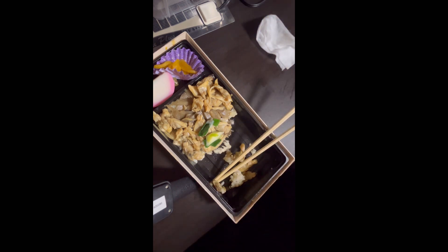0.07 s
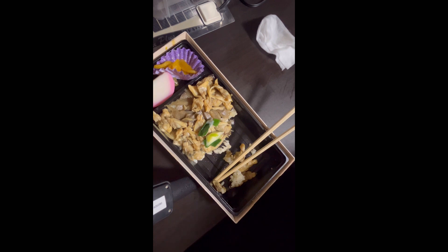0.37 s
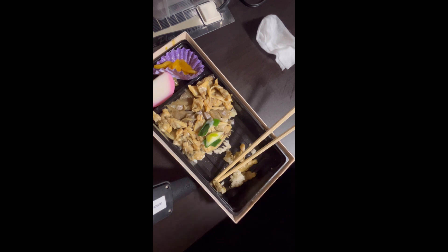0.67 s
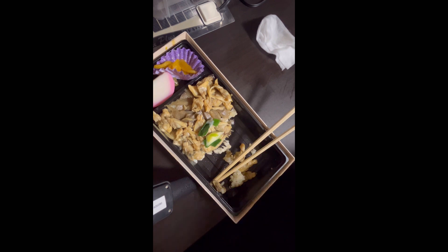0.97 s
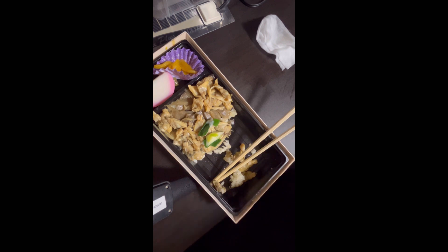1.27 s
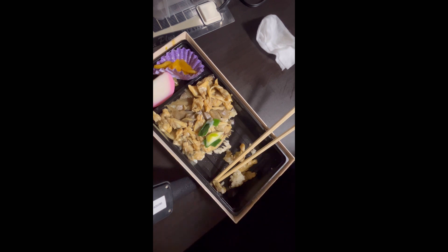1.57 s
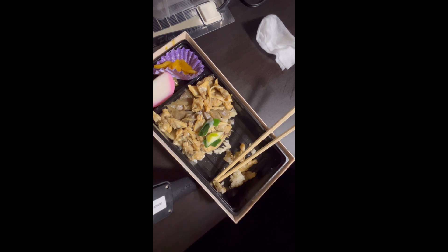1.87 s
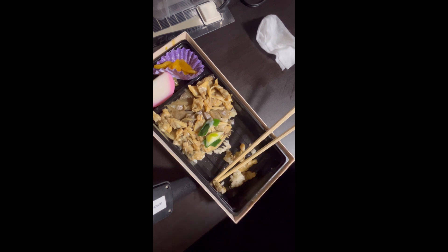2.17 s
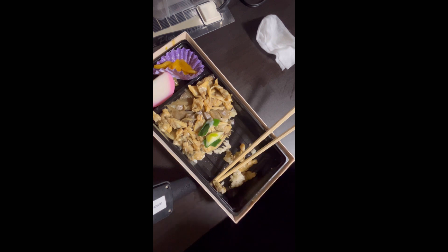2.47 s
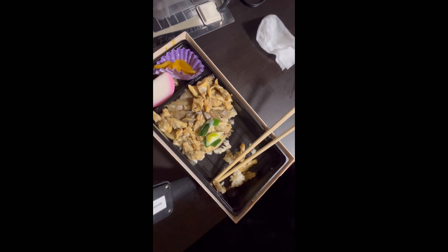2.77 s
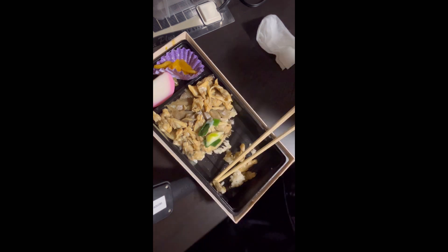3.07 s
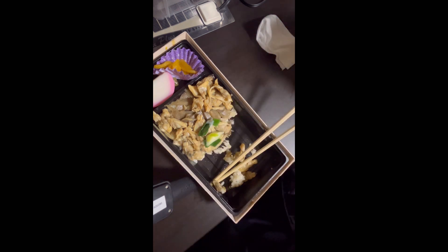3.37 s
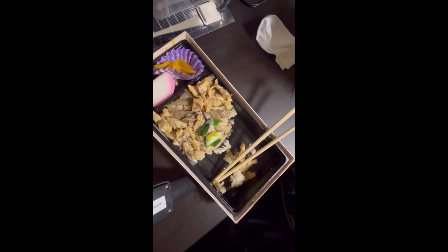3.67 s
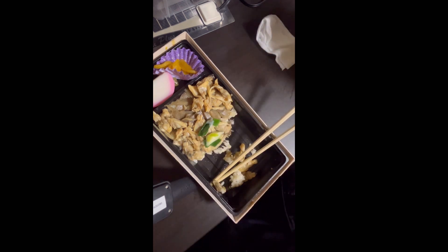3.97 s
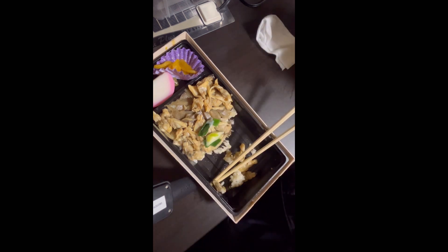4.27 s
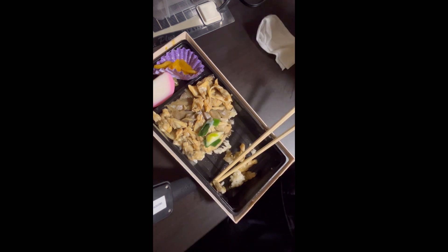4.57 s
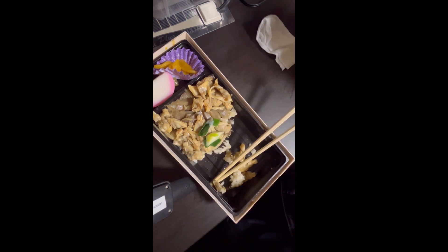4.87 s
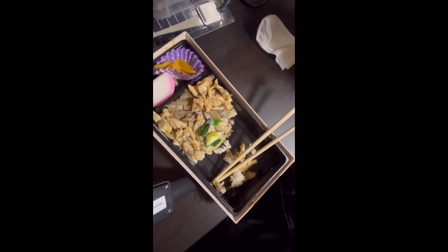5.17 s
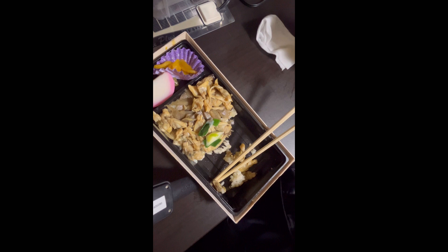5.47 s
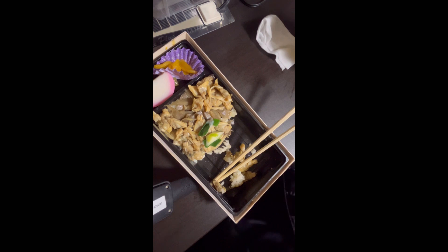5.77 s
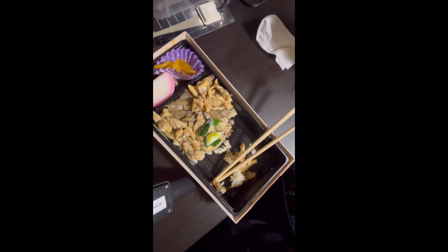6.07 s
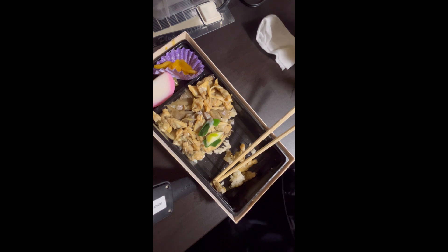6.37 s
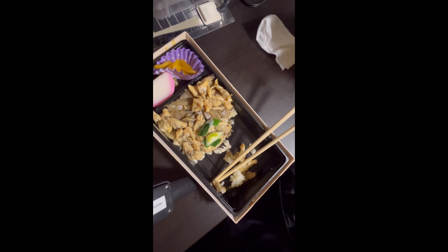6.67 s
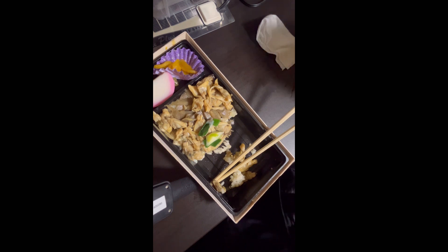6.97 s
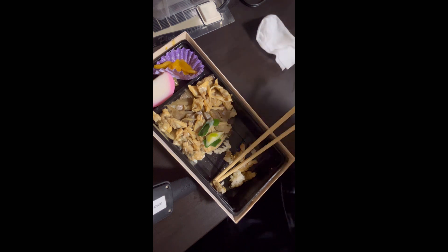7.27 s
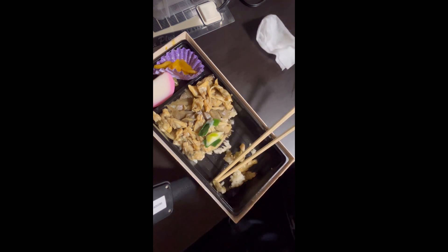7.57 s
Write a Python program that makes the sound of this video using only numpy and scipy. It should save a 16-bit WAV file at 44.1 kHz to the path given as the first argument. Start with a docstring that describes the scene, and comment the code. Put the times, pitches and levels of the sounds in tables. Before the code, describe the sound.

Wooden chopsticks pick about in a plastic food box on a table, heard from very near. Irregular soft taps and short scrapes come first, followed by a cluster of crisp wooden clicks. Midway the table judders dully and the box knocks hollowly against it, the loudest moment. After that only light scratching and sparse ticks remain, over faint cloth rustling and the low hum of indoor ventilation.

```python
"""Wooden chopsticks pick about in a plastic food box on a table, close by in a quiet room.
The tips tap, press and scrape the floor of the box; the sticks click on each other or the rim.
Blows ring damped modes, most with a noise crack; scrapes are stick-slip noise in wandering resonances.
The table judders in a dull bump, then the box rocks and knocks on it. A thin, high squeak sounds once.
A rustling sleeve and a low ventilation hum fill the gaps."""
import sys
import numpy as np
from scipy import signal
from scipy.fft import rfft, irfft
from scipy.io import wavfile

SR = 44100
rng = np.random.default_rng(int(sys.argv[2]) if len(sys.argv) > 2 else 0)


def waveform_to_disk(signal):
    """Save audio, clipped to [-1, 1], as 16-bit WAV at the path in sys.argv[1]."""
    frames = np.transpose(np.atleast_2d(signal))
    scaled = np.clip(frames, -1, 1) * 32767
    samples = np.round(scaled).astype(np.int16)
    wavfile.write(sys.argv[1], SR, samples)


N = 340893
BLOW_N = int(0.6 * SR)
BLOW_T = np.arange(BLOW_N) / SR


def amp(db):
    return 10 ** (np.asarray(db) / 20)


def unit_rms(x):
    return x / np.sqrt(np.mean(x ** 2) + 1e-20)


def unit_blow(x):
    """Scale to the energy of 10 ms at level one."""
    return x / np.sqrt(np.sum(x ** 2) / len(x) / (SR / 100))


def lookup(table, hz, column=1):
    """Interpolate over log frequency."""
    table = np.array(table)
    return np.interp(np.log(hz + 1), np.log(table[:, 0] + 1), table[:, column])


def decay(t, t60_s):
    return np.exp(-np.log(1000) * t / t60_s)


def add(mix, start_s, sound):
    part = mix[:, round(start_s * SR):][:, :sound.shape[1]]
    part += sound[:, :part.shape[1]]


def colour(x, gains, column=1):
    """Minimum-phase filter from (frequency [Hz], gain [dB]) rows."""
    log_gain = np.log(amp(lookup(gains, abs(np.fft.fftfreq(2048, 1 / SR)), column)))
    impulse = np.fft.ifft(np.exp(signal.hilbert(log_gain).conj())).real
    return signal.oaconvolve(x, impulse[None], axes=1)[:, :x.shape[1]]


def tone(x, bass_db, treble_db):
    """Soft contacts favour the bass, hard ones the treble."""
    return colour(x, [(200, bass_db), (800, 0), (3000, 0), (12000, treble_db)])


def lift(x, hz, db, span=1.414):
    """The contact spot lifts one broad resonance."""
    return colour(x, [(hz / span, 0), (hz, db), (hz * span, 0)])


def resonate(x, hz, width_hz):
    """Unity-gain resonance following the curve hz."""
    carrier = np.exp(2j * np.pi * np.cumsum(hz) / SR)
    pole = np.exp(-np.pi * width_hz / SR)
    return 2 * (carrier * signal.lfilter([1 - pole], [1, -pole], x / carrier + 1e-18)).real


def drift(per_s, size=N):
    """Straight lines between unit Gaussian knots."""
    knots = rng.standard_normal(int(size / SR * per_s) + 2)
    return np.interp(np.arange(size) / SR * per_s, np.arange(len(knots)), knots)


def snags(per_s, size=N, release_s=0.0006):
    """Random catches of uneven strength."""
    catches = (rng.random(size) < per_s / SR) * rng.random(size)
    return signal.lfilter([1], [1, -np.exp(-1 / (release_s * SR))], catches)


# Right channel's lag for close sounds: (frequency [Hz], phase [rad])
RIGHT_LAG = [(60, 0.5), (300, -1.0), (700, -2.5), (1400, -2), (2000, 0.87), (2700, 4.5), (6500, 4),
             (8000, 6.5), (10200, 10), (12300, 12), (14500, 17)]
def near_noise(size):
    """One white noise, arriving out of step left and right."""
    lag_rad = lookup(RIGHT_LAG, np.fft.rfftfreq(size, 1 / SR)) * np.array([[0], [1]])
    return irfft(rfft(rng.standard_normal(size)) * np.exp(-1j * lag_rad), size)


# Left-right likeness of diffuse sound: (frequency [Hz], correlation [-1..1])
DIFFUSE_CORRELATION = [(50, 0.88), (150, 1), (400, 0.26), (1000, -0.6), (4000, -0.21), (14000, -0.36)]
def diffuse_noise(size):
    """White noise, partly alike left and right."""
    left, other = rfft(rng.standard_normal((2, size)))
    same = np.clip(lookup(DIFFUSE_CORRELATION, np.fft.rfftfreq(size, 1 / SR)), -1, 1)
    right = same * left + np.sqrt(1 - same ** 2) * other
    return irfft(np.array([left, right]), size)


def ring(modes, pitch=1, rise_cycles=0.6, scatter_db=0):
    """Damped modes with a brief build-up; scatter varies their balance per blow."""
    out = np.zeros((2, BLOW_N))
    for k, (hz, db, t60_s) in enumerate(modes):
        lag_rad = lookup(RIGHT_LAG, hz) * np.array([[0], [1]])
        swing = (-1) ** k * np.sin(2 * np.pi * hz * pitch * BLOW_T - lag_rad)
        rise = 1 - np.exp(-BLOW_T * hz / rise_cycles)
        out += amp(db + scatter_db * rng.standard_normal()) * decay(BLOW_T, t60_s) * rise * swing
    return unit_blow(out)


def crack(spectrum, t60_s, rise_s=0.0018):
    """Dense, quickly damped modes of a contact, as a noise burst."""
    envelope = decay(BLOW_T, t60_s) * (1 - np.exp(-BLOW_T / rise_s))
    return unit_blow(colour(near_noise(BLOW_N) * envelope, spectrum))


# Hum lines: (frequency [Hz], level [dB])
HUM_LINES = [(52, -66.5), (177, -75.5)]
# Air wash: (time [s], level [dB])
AIR_LEVELS = [(0, -59.5), (3, -64.5), (7, -66), (7.7, -66)]
# Air wash: (frequency [Hz], gain [dB])
AIR_SPECTRUM = [(20, -12.5), (50, 8), (90, -5), (190, -2.5), (330, -6), (600, -21), (860, -8),
                (1200, -19.5), (2500, -24.5), (6000, -38.5), (12000, -35.5), (16000, -46.5)]
def ventilation(swell_db=0.5, waver_cycles=0.14):
    """A dull wash of air with two wavering hum lines."""
    t = np.arange(N) / SR
    hum = sum(amp(db) * np.sqrt(2) * np.sin(2 * np.pi * (hz * t + waver_cycles * drift(9.6)))
              for hz, db in HUM_LINES)
    air_db = np.interp(t, *np.transpose(AIR_LEVELS)) + swell_db * drift(2.5)
    return hum + amp(air_db) * unit_rms(colour(diffuse_noise(N), AIR_SPECTRUM))


def brush(start_s, length_s, db, rise_share=0.61, release_db_per_s=184):
    """Envelope of one sleeve move: rise, hold, release."""
    t = np.arange(N) / SR - start_s
    rise = np.sin(np.pi / 2 * np.clip(t / (rise_share * length_s), 0, 1))
    return rise * amp(db - release_db_per_s * np.maximum(t - length_s, 0))


# Hand moves: (start [s], length [s], level [dB])
SLEEVE_MOVES = [(-.06, 0.24, -56.5), (0.23, 0.29, -66), (0.651, .16, -56), (0.872, 0.083, -58.5),
                (1.288, 0.059, -57), (1.4, 0.083, -59.5), (2.682, 0.024, -63), (3.522, 0.043, -61),
                (3.805, 0.11, -69.5), (4.388, 0.26, -67.5), (4.949, 0.2, -69), (5.322, 0.021, -59.5),
                (5.34, 0.22, -71), (5.621, 0.081, -66), (6.365, 0.024, -57.5), (6.407, 0.19, -65.5),
                (6.664, 0.065, -61.5)]
# Cloth rustle: (frequency [Hz], gain [dB])
CLOTH_SPECTRUM = [(200, -9), (1200, -3.5), (2000, -2.5), (2900, -9.5), (4500, 1), (6000, -3), (8000, 3.5),
                  (11500, -1.5), (13200, 0.5), (14500, -5.5), (17000, -11.5)]
def sleeve(rest_db=-89.5, grain_db=2, snag_db=4):
    """Cloth fibres slide in a grainy hiss and snag; the finest sparkle on their own."""
    speed = np.sqrt(amp(rest_db) ** 2 + sum(brush(*move) ** 2 for move in SLEEVE_MOVES))
    slide = diffuse_noise(N) * (amp(grain_db * drift(510)) + amp(snag_db) * snags(per_s=110))
    highpass = signal.butter(2, 10000, "high", fs=SR, output="sos")
    sparkle = signal.sosfilt(highpass, near_noise(N)) * amp(1 - drift(200))
    return speed * unit_rms(colour(slide + sparkle, CLOTH_SPECTRUM))


# Contact snap: (frequency [Hz], gain [dB])
SNAP_SPECTRUM = [(500, -24.5), (3000, -11.5), (7000, -0.5), (12500, 3.5), (16000, -1.5)]
def snap(t60_s, rise_s):
    """The bright first instant of a tap or click."""
    return crack(SNAP_SPECTRUM, t60_s, rise_s)


# Tapped box: (frequency [Hz], level [dB], t60 [s])
BOX_MODES = [(179, -17.5, 0.042), (300.4, -4, 0.043), (466, 3, 0.025), (830, -3.5, 0.015), (1059, 2, 0.012),
             (1650, -5, 0.0095), (2070, 0, 0.0067), (3933, -5, 0.0072), (5170, -8, .006)]
# Tap crack: (frequency [Hz], gain [dB])
TAP_SPECTRUM = [(80, -15), (200, 0.5), (450, 6.5), (1200, 4), (2000, 4), (3200, -2.5), (5000, -5),
                (8000, -4), (12000, -7.5), (16000, -20)]
# Tip strikes: (time [s], level [dB], bass [dB], treble [dB], resonance [Hz], lift [dB])
TIP_TAPS = [(.13, -49, 6, -13, 450, 0.5), (.38, -44, 12, -29, 420, 2), (.468, -30.5, -1, 4, 980, 7.5),
            (.935, -46.5, 20, 9, 397, 7), (.978, -31.5, -16, -0.5, 4760, 10.5),
            (.985, -31.5, 15.5, -7, 490, 5), (1.046, -46, 13, -12, 503, 8),
            (1.113, -51.5, 0.5, -8, 1090, 9), (1.14, -47, -23, 4, 1900, 16), (1.15, -29, 3, 0, 1050, 5),
            (1.519, -34, -17, -13, 5150, 7), (1.524, -30.5, 1, -8.5, 446, 7),
            (1.664, -29.5, -3.5, 3, 2613, 2.5), (2.536, -45, 2, -10, 292, 13),
            (4.554, -42.5, 8.5, 1.5, 3500, 13.5), (4.655, -45.5, -2, -10, 570, 14),
            (4.731, -55.5, -4, -25, 2270, 13), (4.786, -41, -4, -2, 2280, 9.5),
            (5.832, -39, -30.5, -18, 985, 12), (7.451, -52, 23, -20.5, 301, 8.5)]
def taps():
    """Tips strike the floor of the box, ringing it a little differently at each spot."""
    out = np.zeros((2, N))
    for time_s, db, bass_db, treble_db, lift_hz, lift_db in TIP_TAPS:
        pitch = 1 + 0.04 * rng.standard_normal()
        tap = ring(BOX_MODES, pitch, scatter_db=3.5) + crack(TAP_SPECTRUM, t60_s=0.016)
        tap += amp(-10) * snap(t60_s=0.01, rise_s=0.0023)
        tap = lift(tone(tap, bass_db, treble_db), lift_hz, lift_db)
        add(out, time_s, amp(db) * unit_blow(tap))
    return out


# Rubbed stick and box: (frequency [Hz], width [Hz], gain [dB])
RUB_MODES = [(571, 63, 0.5), (896, 120, -0.5), (1280, 90, -6), (1705, 170, -1), (2295, 100, 4.5),
             (3000, 400, -9.5), (3480, 110, -2.5), (4800, 210, -11), (5980, 50, -15)]
# Friction hiss: (frequency [Hz], gain [dB])
HISS_SPECTRUM = [(100, -14), (600, -3), (1000, 3), (1700, -2.5), (2250, 7), (2800, -4.5), (3550, 4.5),
                 (4300, -2.5), (5200, -7), (7000, -13), (12000, -22.5), (16000, -28.5)]
# Drags: (start [s], peak [s], end [s], level [dB], bass [dB], treble [dB], resonance [Hz], lift [dB])
TIP_DRAGS = [(0.296, 0.318, .335, -52, 25, -5, 394, 12), (0.897, 0.931, .978, -51.5, -9, 4, 4200, 4),
             (1.42, 1.437, 1.49, -50, 1, -7, 850, 10), (1.495, 1.506, 1.6, -46.5, 8, 2, 4000, 4),
             (2.103, 2.114, 2.12, -39, -28, 4, 6060, 15), (2.165, 2.202, 2.205, -45, -20, 4, 6255, 10),
             (2.425, 2.445, 2.447, -44.5, 0, 7.5, 2880, 17),
             (3.941, 3.946, 3.968, -54, 0.5, -14.5, 3790, 5.5),
             (4.136, 4.138, 4.21, -48, 1.5, 4.5, 2120, 8), (4.212, 4.247, 4.27, -35, 7, 17, 4170, 20),
             (4.417, 4.425, 4.45, -40.5, 13, -0.5, 4300, 5),
             (4.574, 4.646, 4.672, -45, 2.5, 3.5, 4520, 7.5),
             (4.837, 4.875, 4.925, -40.5, 10.5, -1, 2040, 3.5),
             (5.095, 5.109, 5.18, -58.5, 8.5, -21.5, 1010, 13.5), (5.637, 5.642, 5.71, -52, -8, 6, 4340, 8),
             (5.747, 5.754, 5.785, -46, 0, -35, 1680, 2), (5.769, 5.799, 5.85, -37, -9, -17, 1660, 5),
             (5.828, 5.828, 5.99, -52, -1, 1.5, 1004, 8), (5.916, 5.96, 6.02, -56.5, 17.5, -23, 550, 9.5),
             (6.37, 6.49, 6.8, -65, -1.5, 11, 4420, 14.5), (6.473, 6.482, 6.499, -51, -8, -11, 3300, 8),
             (6.666, 6.788, 6.87, -72, -11.5, -12.5, 1480, 22),
             (7.022, 7.031, 7.055, -52.5, -4.5, -15, 2590, 2),
             (7.456, 7.469, 7.49, -61.5, 18.5, -10.5, 4200, 5)]
def scrapes(slip_db=3.5, catch_db=2.5, crumb_db=17, grit_db=5, hiss_db=-5, wander=0.012):
    """A dragged tip slips and catches, driving resonances that wander as it travels; crumbs crackle."""
    out = np.zeros((2, N))
    for start_s, peak_s, end_s, db, bass_db, treble_db, lift_hz, lift_db in TIP_DRAGS:
        t = np.arange(start_s, end_s, 1 / SR)
        size = len(t)
        grip = amp(slip_db * drift(900, size) + catch_db * drift(130, size))
        crumbs = amp(crumb_db) * snags(110, size)
        slips = (grip + crumbs) * near_noise(size)
        grit = amp(grit_db * drift(1800, size))
        body = sum(amp(mode_db) * resonate(slips, hz * (1 + wander * drift(36, size)), width_hz)
                   for hz, width_hz, mode_db in RUB_MODES)
        hiss = colour(grip * grit * near_noise(size), HISS_SPECTRUM)
        rub = tone(unit_rms(body) + amp(hiss_db) * unit_rms(hiss), bass_db, treble_db)
        pressure = np.sin(np.pi / 2 * np.interp(t, [start_s, peak_s, end_s], [0, 1, 0]))
        add(out, start_s, amp(db) * unit_rms(lift(rub, lift_hz, lift_db)) * pressure)
    return out


# Wooden stick: (frequency [Hz], level [dB], t60 [s])
STICK_MODES = [(334, -18, 0.024), (836, -11.5, 0.035), (1290, -2, 0.032), (1630, -5, 0.018),
               (2220, -3.5, .034), (2615, -4.5, 0.03), (2878, -3, 0.013), (3903, -2.5, 0.026),
               (4820, -4.5, 0.032), (6250, 0, 0.013), (8230, -2.5, 0.007)]
# Click crack: (frequency [Hz], gain [dB])
CLICK_SPECTRUM = [(50, -22.5), (200, -11.5), (600, -14), (1200, 0), (2500, 1.5), (4000, 6), (6000, 0.5),
                  (8500, -2.5), (12000, -3.5), (16000, -8.5)]
# Stick strikes: (time [s], level [dB], bass [dB], treble [dB], resonance [Hz], lift [dB])
STICK_CLICKS = [(0.338, -43, -16, 4.5, 5200, 2.5), (2.116, -23, -23.5, 2, 1250, 1),
                (2.185, -40, 15, -16, 6100, 11), (2.189, -18, 5, 7, 2850, 16.5),
                (2.193, -21, 1, -5, 1350, 8.5), (2.2845, -28, 3, 8, 3890, 6.5),
                (2.4405, -26, 21, 11, 2740, 14), (3.427, -46, 0.5, -2.5, 1160, 17.5),
                (3.558, -47.5, -6.5, 6, 4014, 1.5), (4.2307, -19, 13, 6, 2040, 13.5),
                (4.342, -27.5, 19, -4, 1130, 17), (4.347, -23, 26.5, -10, 4200, 7.5),
                (5.831, -37, 19.5, -14, 7860, 8.5), (6.582, -61.5, -6.5, -5, 4200, 16),
                (6.8, -62.5, -5, -2.5, 5300, 16), (6.896, -35, -7, 6.5, 5200, 16),
                (7.241, -59.5, 1.5, 6.5, 3500, 19.5)]
def clicks(doubling_db=23.5):
    """Stick hits stick or rim: crack, snap and wooden modes. Returns direct sound and room send."""
    direct, send = np.zeros((2, 2, N))
    for time_s, db, bass_db, treble_db, lift_hz, lift_db in STICK_CLICKS:
        t60_s = 0.018 * 2 ** (-treble_db / doubling_db)  # soft contacts last longer
        pitch = 1 + 0.006 * rng.standard_normal()
        wood = ring(STICK_MODES, pitch, rise_cycles=0.39, scatter_db=2.5)
        contact = crack(CLICK_SPECTRUM, t60_s, rise_s=0.00083)
        contact += amp(-5) * snap(0.13 * t60_s, rise_s=0.002)
        click = lift(contact + amp(2.5) * wood, lift_hz, lift_db)
        add(direct, time_s, amp(db) * unit_blow(tone(click, bass_db, treble_db)))
        burst = crack(CLICK_SPECTRUM, t60_s / 10, rise_s=0.00039)
        radiated = lift(burst + amp(-5) * wood, lift_hz, lift_db / 2)
        add(send, time_s, amp(db) * unit_blow(tone(radiated, bass_db, treble_db)))
    return direct, send


# Box floor: (frequency [Hz], level [dB], t60 [s])
FLOOR_MODES = [(123.7, 3, .17), (164.8, -1, 0.1), (260.2, 2, 0.13)]
# Firm contacts: (time [s], level [dB], pitch [ratio])
TIP_PRESSES = [(0.472, -44.5, 0.81), (0.991, -34, 0.96), (1.524, -37.5, 0.99), (1.669, -41.5, 0.82)]
def presses():
    """Firm tips push the box floor down and ring its low modes."""
    out = np.zeros((2, N))
    for time_s, db, pitch in TIP_PRESSES:
        add(out, time_s, amp(db) * ring(FLOOR_MODES, pitch, rise_cycles=0.5))
    return out


# Squeak glide: (time [s], pitch [Hz])
SQUEAK_GLIDE = [(1.8, 11600), (1.85, 12900), (1.945, 14000), (2.02, 12600), (2.125, 12200)]
# Squeak strands: (pitch [ratio], width [Hz], level [dB])
SQUEAK_STRANDS = [(1, 420, -75), (.905, 560, -79)]
def squeak(fade_s=0.024, flutter_db=4):
    """A thin, wet stick-slip note: narrow noise strands gliding together."""
    times_s, glide_hz = np.transpose(SQUEAK_GLIDE)
    t = np.arange(times_s[0], times_s[-1], 1 / SR)
    swell = np.clip(np.minimum(t - times_s[0], times_s[-1] - t) / fade_s, 0, 1)
    out = np.zeros((2, N))
    for ratio, width_hz, db in SQUEAK_STRANDS:
        hz = ratio * np.interp(t, times_s, glide_hz)
        strand = resonate(resonate(near_noise(len(t)), hz, width_hz), hz, width_hz)
        add(out, times_s[0], swell * amp(db + flutter_db * drift(80.7, len(t))) * unit_rms(strand))
    return out


# Table top: (frequency [Hz], level [dB], t60 [s])
TABLE_MODES = [(58.4, -3.5, 0.47), (86.5, 0.5, 0.13), (126, -3.5, 0.17), (201.6, -15.5, 0.3),
               (322, -18, 0.16), (522, 2.5, 0.071), (705, -24.5, 0.098)]
# Dull thud: (frequency [Hz], gain [dB])
THUD_SPECTRUM = [(60, -6.5), (150, 0), (300, -0.5), (500, -5), (800, -11), (1500, -22.5), (4000, -29.5),
                 (16000, -40)]
# Judder: (time [s], level [dB], pitch [ratio], bass [dB])
TABLE_BUMPS = [(3.431, -27, 0.88, -5), (3.446, -28, 0.82, 9), (3.463, -26, 1.02, -0.5),
               (3.484, -36.5, 1.35, 1.5)]
def bumps():
    """The table judders: quick, dull blows ring its top."""
    out = np.zeros((2, N))
    for time_s, db, pitch, bass_db in TABLE_BUMPS:
        bump = ring(TABLE_MODES, pitch, rise_cycles=0.46) + amp(-13) * crack(THUD_SPECTRUM, t60_s=0.3)
        add(out, time_s, amp(db) * unit_blow(tone(bump, bass_db, treble_db=0)))
    return out


# Box base: (frequency [Hz], level [dB], t60 [s])
BASE_MODES = [(113, -18, 0.48), (140, -7.5, 0.08), (167.2, -6.5, 0.1), (218.4, -13.5, 0.23),
              (313, -4, 0.17), (364.6, -3.5, 0.11), (393, -7, .055), (470, -13.5, .1), (607, -15, 0.06),
              (752, -9, 0.082), (915, -12, 0.04)]
# Box on table: (time [s], level [dB], left minus right [dB])
BOX_KNOCKS = [(4.232, -39.5, -2), (4.345, -20, -0.5)]
def knocks():
    """The box rocks on the table and its hollow base rings."""
    out = np.zeros((2, N))
    for time_s, db, pan_db in BOX_KNOCKS:
        pan = amp([[pan_db / 2], [-pan_db / 2]])
        add(out, time_s, amp(db) * unit_blow(pan * ring(BASE_MODES, rise_cycles=0.62)))
    return out


# Echoes off table and box walls: (left delay [s], right delay [s], gain [dB])
NEAR_ECHOES = [(.00068, 0.00062, -23.5), (.00135, 0.0031, -17), (.0027, 0.0013, -17.5)]
def nearby(x):
    """Close, hard surfaces comb the sound differently left and right."""
    out = x.copy()
    for left_s, right_s, db in NEAR_ECHOES:
        add(out, left_s, amp(db) * x * [[1], [0]])
        add(out, right_s, amp(db) * x * [[0], [1]])
    return out


# Reverberation: (frequency [Hz], gain [dB], t60 [s])
ROOM_BANDS = [(60.2, -6, 1), (198.6, 4, 0.38), (599, 5, 0.17), (1489, 2.5, 0.31), (4018, 0, 0.32),
              (7660, 0, 0.19), (12400, -2, 0.34), (15900, -2.5, 0.15)]
def room_tail(onset_s=0.0036, early_db=-2, early_t60_s=0.093, clump_db=2):
    """Reflections arrive in clumps, strong at first; each band decays at its own rate."""
    reflections = diffuse_noise(BLOW_N) * amp(clump_db * drift(350, BLOW_N))
    hz, t, bands = signal.stft(reflections, SR, nperseg=256)
    t60_s = lookup(ROOM_BANDS, hz, column=2)[:, None]
    tail = signal.istft(bands * decay(t, t60_s), SR)[1][:, :BLOW_N]
    onset = 1 - np.exp(-(BLOW_T / onset_s) ** 2)
    early_boost = 1 + amp(early_db) * decay(BLOW_T, early_t60_s)
    tail = colour(tail * onset * early_boost, ROOM_BANDS)
    return tail / np.linalg.norm(tail[0])


def room(x, tails=3, crossfade_hz=2.3):
    """Three reverb tails crossfade steadily, so the room rings at no fixed pitch."""
    cycles = np.arange(N) / SR * crossfade_hz
    shares = [np.sqrt(2 / tails) * np.cos(2 * np.pi * (cycles + k / tails)) for k in range(tails)]
    return sum(signal.fftconvolve(x * share, room_tail(), axes=1)[:, :N] for share in shares)


def scene():
    """Contacts and their reverberation, plus sleeve, squeak and ventilation."""
    click_direct, click_send = clicks()
    tips = amp(-3.5) * nearby(taps() + scrapes())
    sticks = amp(-2.5) * nearby(click_direct)
    heavy = knocks() + presses() + bumps()
    reverb = room(amp(-9.5) * tips + amp(-14.5) * click_send + amp(-14) * heavy)
    cloth = amp(-2.5) * nearby(sleeve())
    return tips + sticks + heavy + reverb + cloth + squeak() + ventilation()


# Tone colour: (frequency [Hz], left gain [dB], right gain [dB])
CHANNEL_GAINS = [(60, 0.5, -1), (277, -3.5, 1.5), (500, -1.5, 2), (1113, 0.5, -2.5), (2620, -3.5, -3),
                 (4740, 0.5, 2.5), (9390, -0.5, -0.5), (10180, -24.5, -16.5), (11180, -1, -1.5),
                 (13530, -0.5, -0.5), (14700, -11, -9), (15300, -6, -2.5)]
def record(dry, cutoff_hz=16500):
    """Left and right tone colour, with narrow treble dips near 10 and 14.7 kHz; then a low-pass."""
    left = colour(dry[:1], CHANNEL_GAINS, column=1)
    right = colour(dry[1:], CHANNEL_GAINS, column=2)
    lowpass = signal.firwin(255, cutoff_hz, window=("kaiser", 9), fs=SR)
    return signal.oaconvolve(np.vstack([left, right]), lowpass[None], "same")


dry = scene()
out = record(dry)
waveform_to_disk(out)
```